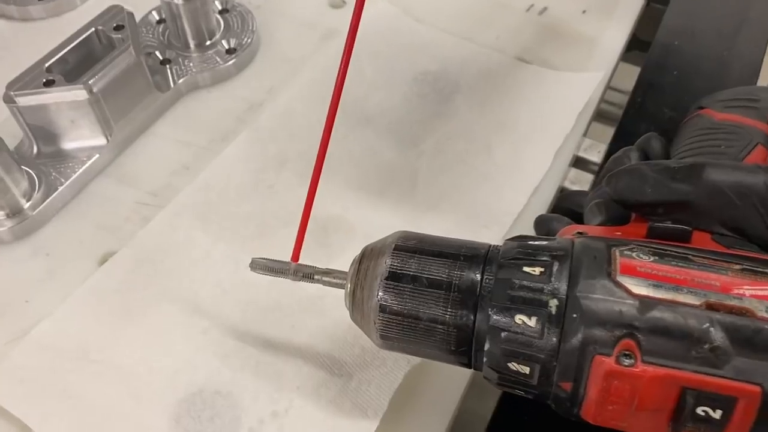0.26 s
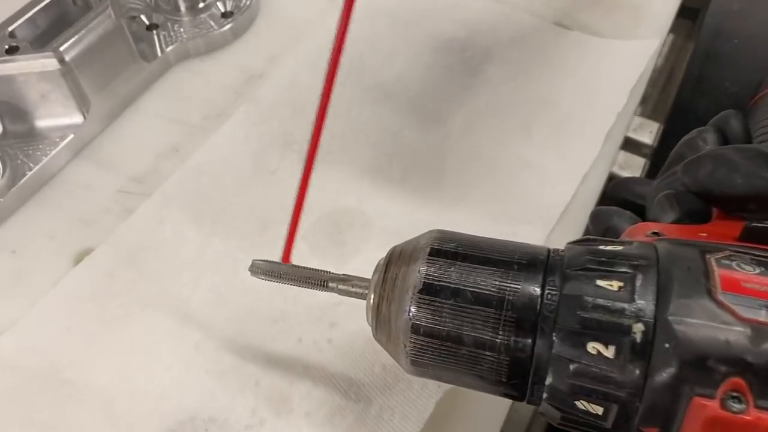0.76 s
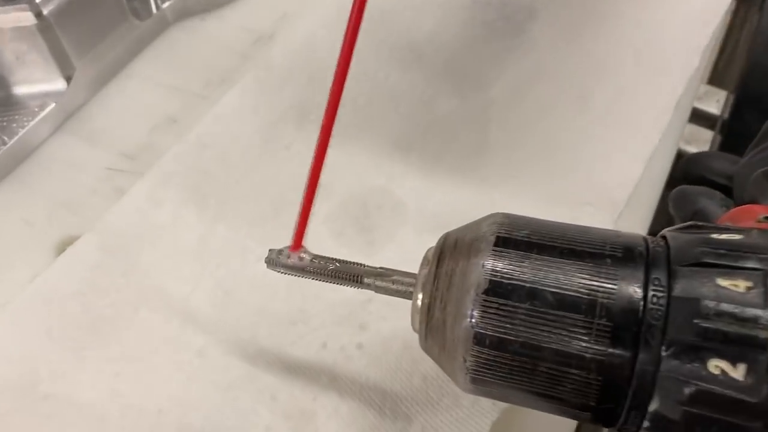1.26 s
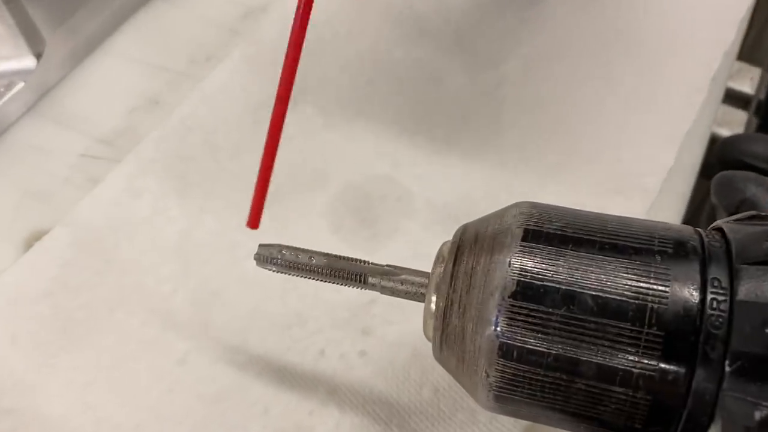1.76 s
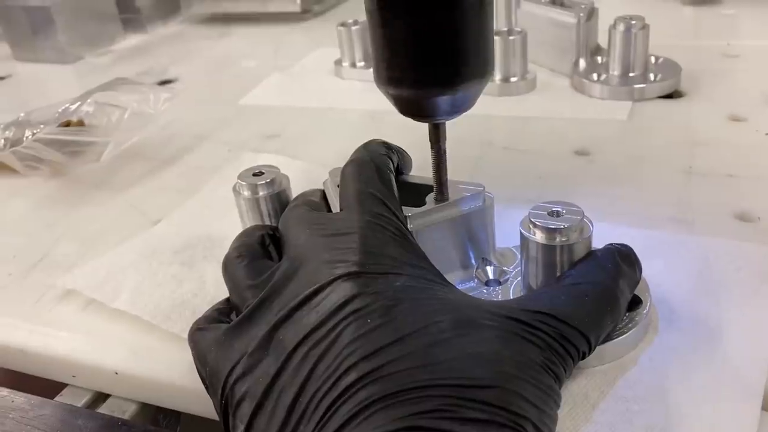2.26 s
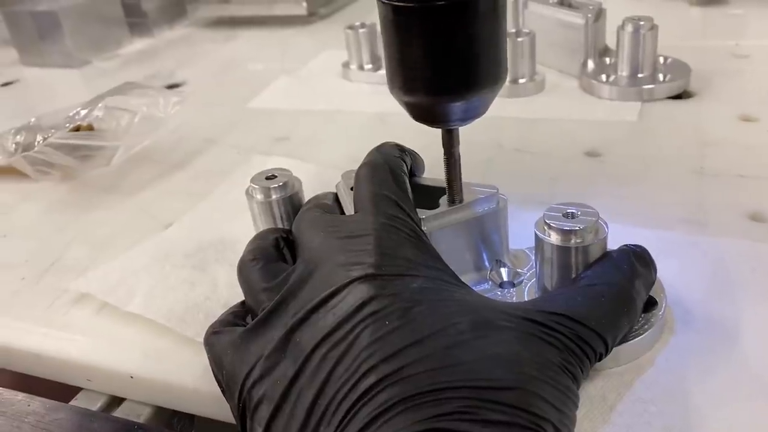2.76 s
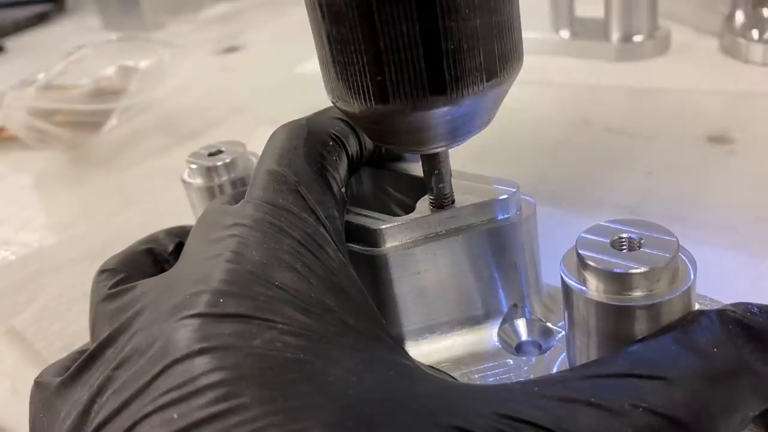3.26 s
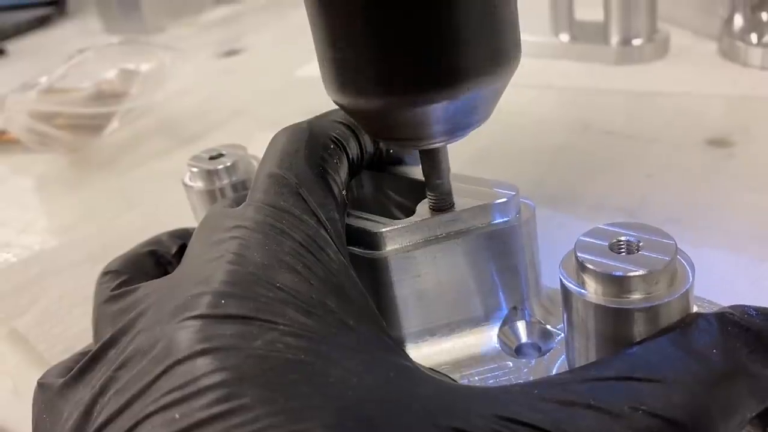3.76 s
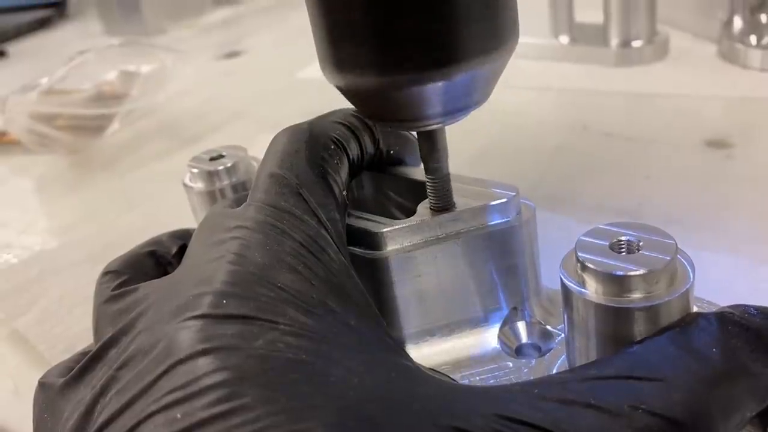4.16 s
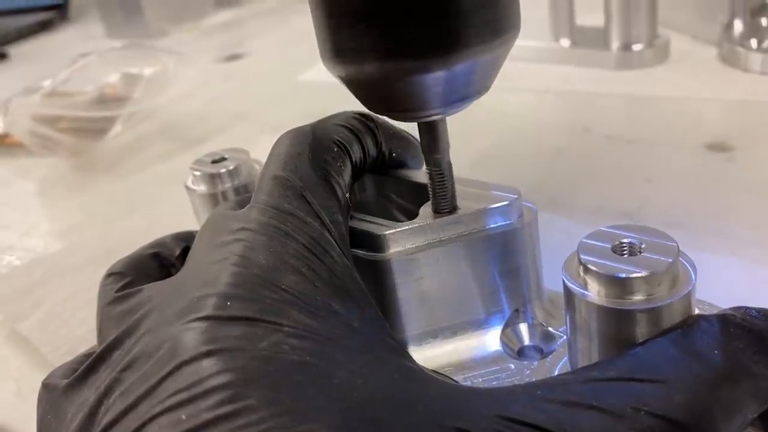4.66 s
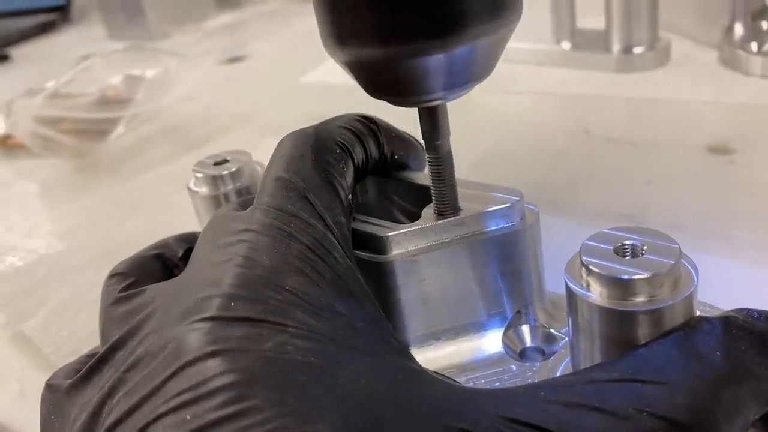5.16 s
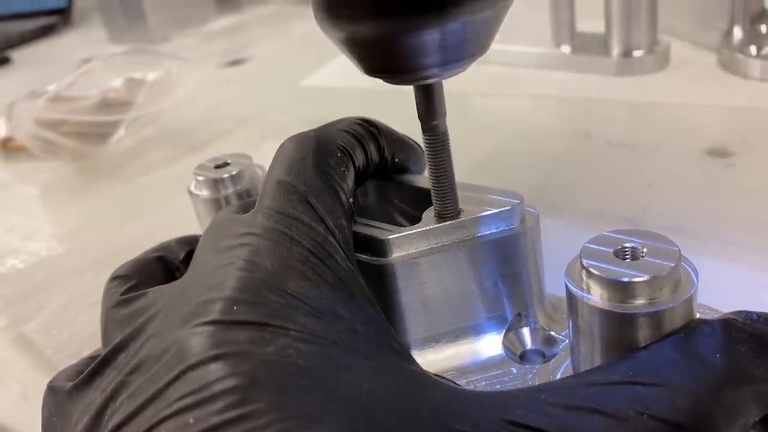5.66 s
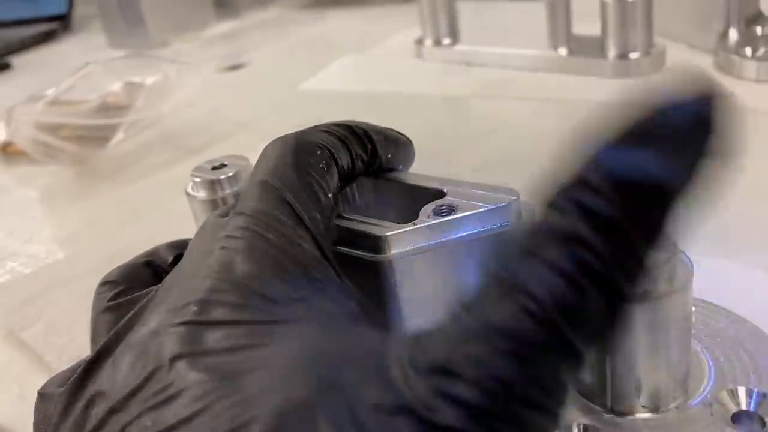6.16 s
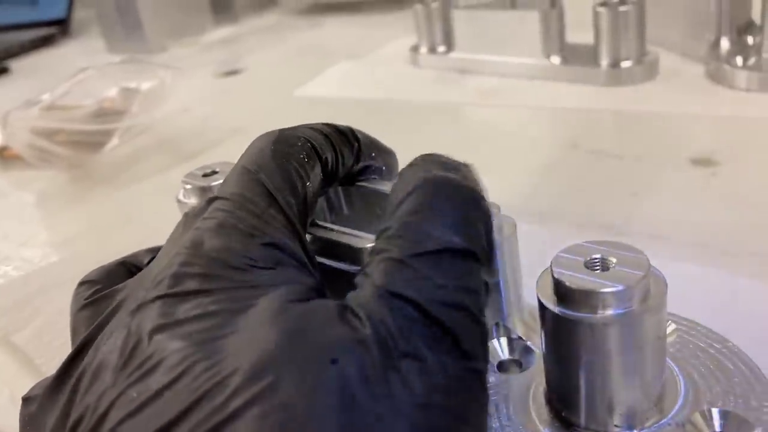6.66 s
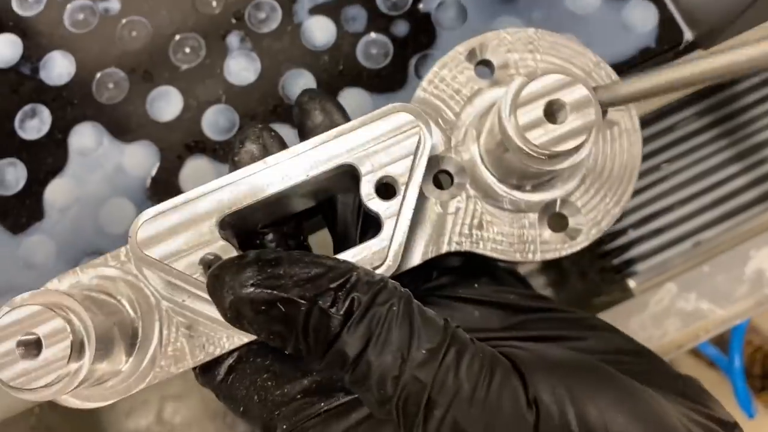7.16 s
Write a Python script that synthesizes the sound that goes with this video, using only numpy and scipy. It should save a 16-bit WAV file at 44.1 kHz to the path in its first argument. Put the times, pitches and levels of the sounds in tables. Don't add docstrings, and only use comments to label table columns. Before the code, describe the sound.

Close stereo pickup at a workshop bench with low ventilation hum. A spray can clicks and hisses briefly, foam fizzes and small parts tick. A cordless drill growls slowly as it taps aluminium, chips scraping, then coasts. Its direction switch snaps and it backs out, whine rising, sagging and climbing again. It brakes with a clack; gloves rustle and squeak, then an air gun hisses.

```python
import sys
import numpy as np
from scipy import signal
from scipy.fft import rfft, irfft, next_fast_len
from scipy.io import wavfile
from scipy.ndimage import map_coordinates

SR = 44100
rng = np.random.default_rng(int(sys.argv[2]) if len(sys.argv) > 2 else 0)


def materialize(psi):
    bounded = np.clip(np.atleast_2d(psi).T, -1, 1)
    quanta = np.round(bounded * 32767).astype(np.int16)
    wavfile.write(sys.argv[1], SR, quanta)


def nominal_scale(level):
    x = np.asarray(level, float) / 20
    return 10 ** x


N = 327663


def at(t0, t1):
    return np.arange(int(t0 * SR), min(int(t1 * SR), N)) / SR


def columns(table):
    s, *cols = np.transpose(table)
    t = at(s[0], s[-1])
    return t, [np.interp(t, s, c) for c in cols]


def on_log(hz, points):
    point_hz, value = np.transpose(points)
    return np.interp(np.log(hz + 1), np.log(point_hz), value)


def walk(n, rate):
    k = int(n * rate / SR) + 2
    return np.interp(np.linspace(0, k - 1, n), np.arange(k), 1.36 * rng.standard_normal(k))


def effort(t, gestures):
    power = 0
    for start, held, db, rise, fall in gestures:
        before = 20 * np.maximum(start - t, 0) / max(rise, .001)
        after = 20 * np.maximum(t - start - held, 0) / max(fall, .001)
        power = power + nominal_scale(2 * (db - before - after))
    return 10 * np.log10(power + 1e-14)


def hiss(n, colour, ref, flicker_db, rate, alike):
    top_hz = 15800
    m = next_fast_len(n)
    hz = np.arange(m // 2 + 1) * SR / m
    left, other = rfft(rng.standard_normal((2, m))) * nominal_scale(on_log(hz, colour)) * (hz > 33) * (hz < top_hz)
    share = np.clip(alike, 0, 1) ** np.clip(hz / 800, 0, 1)
    both = np.array([left, share * left + np.sqrt(1 - share ** 2) * other])
    both /= np.std(irfft(left * (hz > ref[0]) * (hz < ref[1]), m))
    both = both.astype(np.complex64)
    band = np.floor(2 * np.log2(np.clip(hz, 33, top_hz - 1)))
    return sum(irfft(both * (band == b), m)[:, :n] * nominal_scale(flicker_db * walk(n, rate)) for b in np.unique(band))


def flow(t, gestures, colour, flicker_db, rate, alike, grain, extra_db):
    rough = nominal_scale(grain * walk(len(t), 500))
    noise = hiss(len(t), colour, (1500, 6500), flicker_db, rate, alike)
    return nominal_scale(effort(t, gestures) + extra_db) * rough * noise


def tone(hz, wobble, rate=40):
    n = len(hz)
    phase = 2 * np.pi * np.cumsum(hz) / SR + 2 * wobble * walk(n, rate)
    apart = .8 * walk(n, 3)
    return np.sqrt(2) * np.sin([phase, phase + apart]) * nominal_scale(5 * wobble * walk(n, rate))


def notched(x, notches):
    for hz, width_hz in notches:
        x = signal.lfilter(*signal.iirnotch(hz, hz / width_hz, SR), x)
    return x


def bands(t, table):
    out = 0
    for hz, width_hz, gesture in table:
        band = signal.lfilter(*signal.iirpeak(hz, hz / width_hz, SR), rng.standard_normal(len(t)))
        out = out + nominal_scale(effort(t, [gesture])) * band / band.std()
    return np.array([out, out])


# pitch_hz, loss_db
PORT_SHADOW = [(100, 1), (300, 3.5), (1200, 7), (2500, 5), (4500, 8.5), (6500, 2)]


def add(mix, t, x, pan=0.):
    m = next_fast_len(x.shape[1] + 512)
    shade = nominal_scale(-pan * on_log(np.arange(m // 2 + 1) * SR / m, PORT_SHADOW))
    i = int(t * SR)
    x = x[:, :N - i]
    mix[0, i:i + x.shape[1]] += x[0]
    mix[1, i:i + x.shape[1]] += irfft(rfft(x[1], m) * shade, m)[:x.shape[1]]


def clicks(mix, table, thud_hz, crack_db, tail_db, body=()):
    t = at(0, .12)
    for s, db, thud_db, hz, t60, pan_db in table:
        fall = np.exp(-np.log(1000) * t / max(t60, .003)) * np.minimum(t / 0.00026, 1)
        noise = rng.standard_normal((3, len(t)))
        ring = signal.lfilter(*signal.iirpeak(hz, 2.5, SR), noise[0])
        hit = (ring / ring.std() + nominal_scale(crack_db) * np.diff(noise[1], prepend=0)) * fall
        hit *= 1 + 2 * np.exp(-((t - .0006) / .0002) ** 2)
        hit = signal.lfilter(*signal.butter(2, hz / 4, "high", fs=SR), hit)
        if body:
            modes = 0
            for k, (f, width_hz, d) in enumerate(body):
                modes = modes + (-1) ** k * nominal_scale(d) * np.sin(2 * np.pi * f * t) * np.exp(-np.pi * width_hz * t)
            strike = (t == 0) + 0.12 * noise[0] * np.exp(-t / 0.0012)
            hit = signal.fftconvolve(strike, modes)[:len(t)] * np.sqrt(fall)
        thud = signal.lfilter(*signal.iirpeak(thud_hz, 2.5, SR), noise[2])
        hit = hit / abs(hit).max() + nominal_scale(thud_db - 4.5) * thud / thud.std() * np.sqrt(fall)
        tail = nominal_scale(tail_db) * rng.standard_normal((2, len(t))) * np.exp(-t / 0.0061)
        add(mix, s, nominal_scale(db) * (hit * nominal_scale(np.array([[pan_db], [-pan_db]]) / 2) + tail))


# start_s, level_db
SHOP_LEVEL = [(0, -55.5), (2.03, -53), (2.3, -55), (3.3, -56), (4.2, -73), (5.2, -57), (5.9, -57.5),
              (6.15, -66), (6.96, -64.5), (6.98, -74), (7.43, -81)]
# pitch_hz, level_db (per Hz)
SHOP_COLOUR = [(25, -4), (40, -15.5), (57, -2.5), (100, -7.5), (170, -15), (300, -25), (600, -34.5),
               (1500, -44.5), (3000, -51), (6500, -61), (8000, -52), (9300, -57), (13500, -66),
               (15500, -62)]
# start_s, held_s, level_db, rise_s, fall_s
COMPRESSOR = [(0.156, 0.277, -50, 0.27, 0.14), (0.62, 0.843, -49, 0.18, 0.18)]
# pitch_hz, level_db
LAMP = [(7900, -86), (14790, -79)]


def shop(mix):
    t, (db,) = columns(SHOP_LEVEL)
    drone = nominal_scale(effort(t, COMPRESSOR)) * tone(57 + 0 * t, 0.071, 5.3)[0]
    air = nominal_scale(db) * hiss(len(t), SHOP_COLOUR, (30, 70), 0.64, 3.3, 0.3)
    whistle = sum(nominal_scale(d) * tone(f + 0 * t, 0.39, 330) for f, d in LAMP)
    add(mix, 0, drone + air + whistle, .4)


# start_s, held_s, level_db, rise_s, fall_s
SPRAY = [
    (.217, 0.0087, -65, -0.05, -0.2),
    (0.232, 0.022, -43, .002, 0.06),
    (.264, .157, -42, .008, .009),
    (.275, 0, -44, 0.04, 0.04),
    (.43, 0.03, -66, .001, .09),
]
# pitch_hz, level_db (per Hz)
SPRAY_COLOUR = [(300, -12), (800, -5), (1600, -5), (2200, -10.5), (3000, 3), (3570, -5), (4250, 5),
                (4800, -5), (5300, 3.5), (6300, -4.5), (7300, 4), (10000, -2), (13000, 1), (15500, -1)]
# pitch_hz, width_hz
STRAW_NOTCHES = [(2300, 200), (3570, 190), (4800, 210)]
# start_s, peak_db, thud_db, pitch_hz, left_minus_right_db
VALVE = [
    (0.218, -28, -21, 9000, -1),
    (0.2375, -16, -7, 8350, 5.5),
    (0.241, -17, -9.5, 7850, -1),
    (0.263, -14.5, -25, 7400, 0),
    (0.273, -6.5, -18.5, 12500, 10.5),
    (0.4522, -39.5, -9, 2970, 4),
]


def spray_can(mix):
    t = at(.19, .62)
    spray = flow(t, SPRAY, SPRAY_COLOUR, 0.92, 40, 0.37, 1.9, 1.0)
    add(mix, t[0], notched(spray, STRAW_NOTCHES), .5)
    t60_s = 0.0051
    clicks(mix, [(s, db, thud, hz, t60_s, pan) for s, db, thud, hz, pan in VALVE], 650, 0, -25.0)


# start_s, peak_db, thud_db
TICKS = [(0.8753, -65, 13.5), (1.191, -43.5, -23), (1.208, -49, -18), (1.2165, -54, -19), (1.238, -53, -15),
         (1.2435, -48.5, -13), (1.261, -54, 3), (1.3192, -58, 8), (1.3315, -51.5, 4), (1.3468, -50.5, -2),
         (1.748, -47, 1), (1.9315, -53, 8.5), (1.997, -46, -12), (2.08, -41, -2)]
# pitch_hz, width_hz, level_db
TICK_BODY = [(1100, 280, -6), (1970, 160, 0.5), (3570, 300, -5.5), (4850, 400, -14), (7300, 520, -0.5)]


def ticks(mix):
    hz, t60_s, pan_db = 1960, 0.024, 7
    clicks(mix, [(*row, hz, t60_s, pan_db) for row in TICKS], 300, -10.5, -27.5, TICK_BODY)


# start_s, held_s, level_db, rise_s, fall_s
FOAM = [
    (1.06, 0.083, -61.5, .014, .1),
    (1.17, 0.084, -69, .01, .03),
]
# pitch_hz, width_hz, level_db
STRAW = [(1740, 105, 2), (2800, 200, -0.5), (3770, 170, -4.5), (5640, 200, -19)]


def foam(mix):
    t = at(1.03, 1.32)
    noise = rng.standard_normal((2, len(t)))
    fizz = nominal_scale(-21) * noise
    for f, width_hz, d in STRAW:
        fizz = fizz + nominal_scale(d) * signal.lfilter(*signal.iirpeak(f, f / width_hz, SR), noise)
    add(mix, t[0], nominal_scale(effort(t, FOAM)) * fizz / fizz.std(), .4)


def shelf(x, hz, db):
    high = signal.sosfilt(signal.butter(2, hz, "high", fs=SR, output="sos"), x)
    return x + (nominal_scale(db - db.mean()) - 1) * high


def rattle(t, tooth_hz, depth):
    turns = np.cumsum(tooth_hz) / SR
    size = nominal_scale(2.8 * rng.standard_normal(int(turns[-1]) + 1))[turns.astype(int)]
    gate = 1 - depth + depth * size * 2 * np.exp(-(turns % 1) / 0.73)
    return gate / np.sqrt(np.mean(gate ** 2))


# pitch_hz, width_hz, level_db
HOUSING = [(890, 86, -11.5), (1876, 88, -2.5), (2032, 38, -4.5), (2675, 110, -13), (3210, 100, -5.5),
           (4060, 65, -6), (4196, 180, -7.5), (4400, 65, -21)]


def rings(n, beads_db, rate):
    noise = rng.standard_normal((2, n))
    noise[1] = 0.6 * noise[0] + 0.45 * noise[1]
    out = 0
    for f, width_hz, d in HOUSING:
        ring = signal.lfilter(*signal.iirpeak(f, f / width_hz, SR), noise)
        out = out + ring * nominal_scale(d + beads_db * walk(n, rate))
    return nominal_scale(21.5) * out


# start_s, gear_noise_db, bench_shake_db
TAP_IN = [(2.074, -81, -59), (2.079, -44.5, -53), (2.137, -44, -48.5), (2.449, -42.5, -43.5),
          (2.579, -43, -35), (2.941, -37.5, -33), (3.005, -38.5, -53), (3.085, -40.5, -45),
          (3.345, -40, -43.5)]
# pitch_hz, level_db (per Hz)
IN_COLOUR = [(120, -19), (300, -4), (500, 0.5), (800, 3.5), (1100, -4), (1500, -13.5), (2050, -7.5),
             (2700, -12), (3300, -12.5), (4200, -12.5), (5400, -18), (6800, -12.5), (10000, -15),
             (15000, -20)]
# start_s, pitch_hz
MESH = [(2.075, 272), (2.38, 297), (2.5, 275), (2.6, 289), (2.65, 215), (2.78, 231), (2.92, 246),
        (3.12, 230), (3.21, 215), (3.265, 176), (3.345, 178)]
# start_s, held_s, level_db, rise_s, fall_s
PLANET = [
    (2.25, 0.33, -48, 0.59, 0.16),
]
# pitch_hz, level_db
PART_RING = [(2003, -57), (2105, -60)]
# start_s, held_s, level_db, rise_s, fall_s
GROAN = [(3.225, 0.034, -47, .04, .04), (3.3, .03, -43.5, 0.021, 0.014)]
GROAN_UPPER = [(3.25, 0.029, -48, 0.034, 0.028)]
# pitch_hz, level_db
IN_SWITCHING = [(1865, -56.5), (3731, -53.5), (5597, -63), (7461, -46), (14925, -82)]


def tap_in(mix):
    t, (db, shake_db) = columns(TAP_IN)
    pressed_db = shake_db + 44
    shake_hz = 78.3 + (83.45 - 78.3) * np.clip(pressed_db / 9.5, 0, 1)
    octave_db = -61.5 + 1.96 * pressed_db
    mesh_hz = np.interp(t, *np.transpose(MESH))
    planet_db = effort(t, PLANET)
    growl = hiss(len(t), IN_COLOUR, (300, 1300), 1.4, 11, 0.55) + nominal_scale(-12.0) * rings(len(t), 3.5, 25)
    growl = growl * rattle(t, shake_hz, 0.2)
    out = nominal_scale(db) * shelf(growl, 2300, -0.95 * np.maximum(db, -46))
    for k, level_db in ((1, shake_db), (2, octave_db), (3, octave_db - 15.0), (4, octave_db - 12.0)):
        out += nominal_scale(level_db) * tone(k * shake_hz, 0.05)[0]
    out += nominal_scale(planet_db - 4) * tone(mesh_hz, 0.67, 23)
    out += nominal_scale(-50.5) * tone(2 * mesh_hz, 0.46, 28)
    out += nominal_scale(-64) * tone(3 * mesh_hz, .35, 30)
    out += sum(nominal_scale(d + db + 43.5) * tone(f + 0 * t, 0.74, 25) for f, d in PART_RING)
    out += nominal_scale(effort(t, GROAN)) * tone(2 * mesh_hz, .15, 30)
    out += sum(nominal_scale(effort(t, GROAN_UPPER)) * tone(2 * k * mesh_hz, .2, 30) for k in range(2, 7))
    out += nominal_scale(planet_db) * tone(195.6 + 0 * t, 0.081, 10)
    out += sum(nominal_scale(d) * tone(f + 0 * t, 0.14, 24) for f, d in IN_SWITCHING)
    started = np.clip((t - 2.076) * 500, 0, 1)
    add(mix, TAP_IN[0][0], out * started, .3)


# start_s, held_s, level_db, rise_s, fall_s
CHIPS = [
    (2.62, 0, -43, 0.033, 0.17),
    (3.33, 0.0089, -47, 0.91, .002),
    (2.761, 0, -47, .004, .03),
    (2.965, 0.0052, -43.5, .006, 0.052),
    (3.049, 0.037, -51, .005, .04),
    (3.17, 0.019, -49, .004, .03),
    (3.252, 0.00053, -49, .004, .03),
    (3.307, 0.022, -69, .004, .03),
]
# pitch_hz, level_db (per Hz)
CHIP_COLOUR = [(900, -2.5), (1400, -0.5), (2700, -2.5), (4000, -28)]


def chips(mix):
    t = at(2.55, 3.35)
    add(mix, t[0], flow(t, CHIPS, CHIP_COLOUR, 4.4, 12, 0.32, 0.86, 0), .3)


# start_s, held_s, level_db, rise_s, fall_s
COAST = [
    (3.347, 0.055, -50.5, .002, 0.16),
]
# pitch_hz, level_db (per Hz)
COAST_COLOUR = [(200, -1), (500, -5), (1000, 0), (2000, -3.5), (4500, -7), (7000, -19), (10000, -15),
                (15500, -28)]


def coasting(mix):
    t = at(3.34, 3.49)
    add(mix, t[0], flow(t, COAST, COAST_COLOUR, 1.5, 15, 0.15, 1.2, 0), .7)


# start_s, peak_db, thud_db, t60_s, left_minus_right_db
SWITCH = [
    (3.3994, -41, -20, 0.0092, 2.5),
    (3.4876, -13, -34, 0.025, 7.5),
    (3.489, -18, -32, 0.017, 12),
    (3.495, -36, -14.5, 0.012, 4),
    (3.502, -34.5, -9, 0.0066, 2),
    (3.5132, -31, -11, 0.0091, 9.5),
    (3.5988, -28.5, -24, 0.0056, 6),
    (3.6052, -29, -6, 0.0073, 1),
    (3.6241, -21.5, -11, 0.02, 10),
    (3.6302, -21.5, -5, 0.013, 7),
]
# pitch_hz, width_hz, level_db
SWITCH_BODY = [(680, 190, -15.5), (1250, 120, -20), (2070, 85, -17), (3510, 280, -2.5), (4150, 320, -4.5),
               (4750, 140, -13), (6000, 330, 0), (6790, 400, 1.5), (7380, 260, -5.5), (8150, 280, -3),
               (10060, 500, -2), (12460, 360, -2.5)]
# start_s, held_s, level_db, rise_s, fall_s
SLIDE = [
    (3.485, 0.021, -54, .012, 0.025),
    (3.525, 0.045, -65, .02, 0.054),
]
# pitch_hz, level_db (per Hz)
GLOVE_COLOUR = [(300, -0.5), (700, -2.5), (1300, -5.5), (2500, -10.5), (4500, -7.5), (7000, -10.5),
                (10000, -9.5), (15500, -12)]


def direction_switch(mix):
    t = at(3.46, 3.6)
    add(mix, t[0], flow(t, SLIDE, GLOVE_COLOUR, 3.7, 30, 0.47, 1.7, 0), .7)
    rows = [(s, db, thud, 2000, t60, pan) for s, db, thud, t60, pan in SWITCH]
    clicks(mix, rows, 610, -33.5, -24.0, SWITCH_BODY)


def glide(t, points):
    s, v = np.transpose(points)
    slope = np.gradient(v, s)
    k = np.clip(np.searchsorted(s, t) - 1, 0, len(s) - 2)
    h = s[k + 1] - s[k]
    u = np.clip((t - s[k]) / h, 0, 1)
    step = (v[k + 1] - v[k]) * u * u * (3 - 2 * u)
    return v[k] + step + h * u * (1 - u) * ((1 - u) * slope[k] - u * slope[k + 1])


def boom(hz, centre_hz, width_hz, db):
    return db / (1 + (2 * (hz - centre_hz) / width_hz) ** 2)


# start_s, rotor_hz
ROTOR = [(3.64, 235), (3.7, 393), (3.78, 530), (3.89, 584), (3.98, 545), (4.18, 400), (4.3, 349),
         (4.48, 259), (4.66, 221), (4.75, 229), (4.9, 330), (5.06, 414), (5.3, 508), (5.5, 547),
         (5.72, 585), (5.8, 576), (6.0, 561), (6.05, 545)]
# start_s, gear_noise_db, mesh_whine_db
TAP_OUT = [(3.586, -66, -41), (3.6, -46, -40), (3.79, -40.5, -62), (3.95, -41, -43), (4.2, -42, -39),
           (4.45, -43.5, -39), (4.7, -43, -49.5), (4.83, -42, -36.5), (5.05, -41, -35.5), (5.4, -42.5, -42),
           (5.65, -44, -45.5), (6.05, -47.5, -60), (6.085, -48, -65)]
# pitch_hz, level_db (per Hz)
OUT_COLOUR = [(120, -26), (300, -8.5), (500, -1.5), (800, 2.5), (1100, -4.5), (1500, -11), (2050, -4),
              (2700, -8.5), (3300, -3.5), (4200, -6), (5400, -9), (6800, -11), (10000, -16.5), (15000, -14)]
ORDERS_LOW = [.17, 1 / 3, .5, 1, 4 / 3, 2, 3, 7, 7.3, 8, 9, 10]
ORDERS_HIGH = [11.35, 11.67, 16, 17, 18, 18.67, 19.67, 20, 20.67, 21, 12]
# level_db, slope_db (per octave of speed), wobble (0-1)
WHINE = [(1.5, 12, 0.33), (-10, -10, 0.43), (-17, 31, 0.5), (2.5, 3.5, 0.17), (-9.5, 29, 0.37),
         (-5, 6, 0.34), (-7.5, 3.5, 0.1), (-10, 28, 0.12), (-33, 29, 0.2), (-9, 3, 0.3), (-4, 33, 0.05),
         (-14, 40, 0.3), (-6.5, 21, 0), (-5.5, 11, 0.3), (-5, 38.5, 0), (-1.5, 39, 0.2), (-7.5, 9, 0.38),
         (-11, 47, 0.02), (-5, 38, 0.2), (-7, 36, 0.4), (-5, 40, 0.2), (-4, 42, 0), (-9.5, 14, 0.3)]
# rotor_multiple, level_db, slope_db (per octave), wobble (0-1), shivers_per_s
MESH_TONES = [(3.43, -2, 0, .38, 16), (3.3, -11, -4, .5, 40), (4.5, -17, -4, .3, 30),
              (5.5, -16, -4, .3, 30), (6.5, -5, 3, .4, 20), (6.92, -4, 3, .4, 20),
              (10.05, -17, -10, .4, 20), (13.56, -30, -27, .3, 25)]
# start_s, held_s, level_db (10 dB = 3 dB deep), rise_s, fall_s
LOOSE = [
    (5.4, 0.35, 9.3, 0.4, 0.22),
]
# start_s, held_s, level_db, rise_s, fall_s
CHOP = [
    (3.585, .165, 6, .01, .5),
    (4.4, .75, 9, 0.065, .4),
    (6.05, .05, -3, 0.68, .1),
]
# pitch_hz, level_db
OUT_SWITCHING = [(1863, -53.5), (3727, -64.5), (5589, -73), (14925, -85)]
# pitch_hz, width_hz
DEAD_SPOTS = [(2280, 160), (2870, 160), (5400, 330)]
# (start_s, held_s, level_db, rise_s, fall_s)
THUMPS = [(316, 57, (5.76, 0, -47.5, 0.1, 0.3)), (480, 60, (5, -1, -47.5, 1.3, -0.7)),
          (335, 50, (6, .02, -52, -0.5, .3)), (150, 35, (5.5, -0.4, -54, 0.8, 0)),
          (94, 30, (4.5, -1.5, -54.5, 2.2, -1)), (151, 88, (3.5, 0.9, -56, 4, 0.3)),
          (734, 180, (3.635, -0.04, -38.5, 0.4, -0.65))]


def tap_out(mix):
    t, (db, mesh_db) = columns(TAP_OUT)
    braking_hz = 6000 * np.maximum(t - 6.048, 0)
    rotor = glide(t, ROTOR) - braking_hz
    octaves = np.log2(rotor / 570)
    strain_db = 6.5 * np.exp(-np.maximum(t - 3.68, 0) / 0.058)
    whine_db = -38 + 2.5 * octaves + 0.31 * (db + 42.5) + strain_db
    gear_ratio, knock_s = 43.15, 5
    turns = np.cumsum(rotor / gear_ratio) / SR
    throb = nominal_scale(nominal_scale(effort(t, LOOSE)) * np.cos(2 * np.pi * (turns - np.interp(knock_s, t, turns))))
    ring_db = -1.0 - 3.5 * np.clip((t - 5.68) / 0.27, 0, 1)
    gears = hiss(len(t), OUT_COLOUR, (1400, 3000), 1.37, 15, 0.22) + nominal_scale(ring_db) * rings(len(t), 4.1, 25)
    gears = gears * rattle(t, rotor / 3, 0.19)
    out = nominal_scale(db) * throb * shelf(gears, 1630, 5.5 * octaves)
    spun_up = np.clip((t - 3.64) / 0.0055, 0, 1) * np.clip((6.066 - t) / 0.0081, 0, 1)
    cowl = (4150, 500, 10)  # Hz, width Hz, dB
    shell = (1910, 250, 8.5)
    for k, (d, slope, wobble) in zip(ORDERS_LOW + ORDERS_HIGH, WHINE):
        hz = k * rotor
        level_db = whine_db + d + boom(hz, *cowl) + slope * octaves + 0.76 * on_log(hz, OUT_COLOUR)
        out += spun_up * nominal_scale(level_db) * tone(hz, wobble)
    for k, d, slope, wobble, rate in MESH_TONES:
        hz = k * rotor
        level_db = mesh_db + d + boom(hz, *shell) + boom(hz, *cowl) + slope * octaves
        level_db = level_db + .9 * on_log(hz, OUT_COLOUR)
        out += spun_up * throb * nominal_scale(level_db) * tone(hz, max(wobble, .25), rate)
    out = .62 * notched(out, DEAD_SPOTS) + .38 * out + bands(t, THUMPS)
    chop_db = effort(t, CHOP)
    for f, d in OUT_SWITCHING:
        out = out + nominal_scale(d + chop_db) * nominal_scale(4 * walk(len(t), 22)) * tone(f + 0 * t, .25, 30)
    add(mix, TAP_OUT[0][0], out, 1.05)


# start_s, peak_db, thud_db, t60_s, left_minus_right_db
BRAKE = [
    (3.6272, -19.5, -18, 0.012, 7.3),
    (6.0537, -34, -19, 0.023, 4.4),
    (6.065, -15, -20.5, 0.029, 15),
    (6.0734, -21.5, -11, 0.046, 6.1),
]
# pitch_hz, width_hz, level_db
BRAKE_BODY = [(845, 310, -14), (2100, 220, -19), (3600, 450, 3.5), (4900, 260, -1), (6440, 770, -1),
              (9300, 820, 1), (11950, 830, -5)]


def brake(mix):
    rows = [(s, db, thud, 4460, t60, pan) for s, db, thud, t60, pan in BRAKE]
    clicks(mix, rows, 710, -8, -45.0, BRAKE_BODY)


# start_s, peak_db, left_minus_right_db
CLUNKS = [
    (3.6285, -20, 6),
    (6.0535, -24, 6.5),
    (6.0755, -29, -2),
]
# pitch_hz, width_hz, level_db
CLUNK_BODY = [(600, 40, -5), (900, 60, -3), (1300, 170, -11)]


def clunks(mix):
    clicks(mix, [(s, db, -30, 2000, .05, pan) for s, db, pan in CLUNKS], 530, -30, -40.5, CLUNK_BODY)


# start_s, held_s, level_db, rise_s, fall_s
GLOVES = [(6.102, 0, -55.5, 0.0071, 0.1), (6.17, 0.03, -62, .05, 0.15), (6.27, 0.0049, -65.5, 0.068, 0.025),
          (6.409, 0.016, -65.5, 0.21, 0.051), (6.575, 0.0031, -67.5, 0.029, 0.14),
          (6.74, 0.12, -71.5, 0.065, 0.22), (6.92, 0.01, -66, 0.36, 0.079), (6.2, .35, -79, .1, 0.086)]
# start_s, peak_db, thud_db, pitch_hz
SNAPS = [(6.1642, -46, -20, 4480), (6.2592, -42.5, -23, 1440), (6.2665, -47, -22, 5000),
         (6.2884, -48, -15, 1450), (6.392, -44.5, -22, 3310), (6.42, -58, 5, 900), (6.564, -65, -8, 1290),
         (6.5705, -66, -16, 4200), (6.8132, -55, -15, 1300), (6.8557, -50, -17, 3020),
         (6.8771, -59, -15, 1320), (6.897, -55, 2, 800)]


def gloves(mix):
    t = at(6.07, 6.976)
    add(mix, t[0], flow(t, GLOVES, GLOVE_COLOUR, 2.1, 15, 0.16, 2.7, 0.78), .7)
    clicks(mix, [(*row, 0.012, 3) for row in SNAPS], 280, -18.5, -31)


# start_s, end_s, pitch_hz, level_db
FAR = [
    (6.56, 6.75, 4600, -83),
    (6.723, 7.1, 3350, -76),
]


def far_machines(mix):
    for t0, t1, hz, db in FAR:
        t = at(t0, t1)
        add(mix, t0, nominal_scale(db) * np.hanning(len(t)) ** 0.26 * tone(hz + 0 * t, 0.4, 60))


# start_s, held_s, level_db, rise_s, fall_s
SQUEAK = [
    (6.81, 0.022, -63, 0.044, 0.12),
    (6.856, 0.003, -51.5, .004, 0.015),
]


def squeak(mix):
    t = at(6.72, 6.92)
    add(mix, t[0], nominal_scale(effort(t, SQUEAK)) * tone(1270 + 0 * t, 0.84, 220), .7)


# start_s, held_s, level_db, rise_s, fall_s
JET = [
    (6.979, .5, -46, 0.0018, .01),
    (7.32, 0.018, -49.5, 0.075, .12),
]
# pitch_hz, level_db (per Hz)
JET_COLOUR = [(200, -26.5), (600, -16.5), (1000, -12.5), (1600, -9.5), (3000, -4.5), (6400, -4), (7300, 1),
              (8200, 4), (10000, 2), (13000, 2), (15500, 3.5)]
# start_s, delay_ms
JET_ECHO = [
    (6.978, 0.325),
    (7.25, 0.278),
    (7.43, 0.193),
]
# start_s, held_s, level_db, rise_s, fall_s
HOLE = [
    (7.02, 0.1, -51, 0.09, 0.15),
    (7.32, 0, -45.5, 0.022, 0.045),
    (7.4, .05, -61, .05, .05),
]
# pitch_hz, level_db (per Hz)
HOLE_COLOUR = [(900, -17.5), (1400, 2), (2600, -4.5), (3600, -15)]
# (start_s, held_s, level_db, rise_s, fall_s)
EDGES = [(7250, 450, (7.11, .16, -48, .15, .12)), (2700, 350, (7.06, .07, -53, .1, .12)),
         (1650, 300, (7.31, .02, -50, .03, .03)), (2400, 450, (7.315, .015, -52, .03, .03)),
         (6050, 400, (7.39, .04, -50, .06, .05)), (4000, 250, (7.015, .01, -54, .03, .03))]
# pitch_hz, width_hz
PART_NOTCHES = [(3480, 220), (4200, 180), (5650, 110)]


def air_gun(mix):
    t = at(6.976, 7.43)
    air = flow(t, JET, JET_COLOUR, 1, 30, .5, 1, 1)
    echo_ms = np.interp(t, *np.transpose(JET_ECHO))
    late = np.arange(len(t)) - echo_ms * SR / 1000
    treble = signal.sosfiltfilt(signal.butter(2, 7000, "high", fs=SR, output="sos"), air)
    echo = np.array([map_coordinates(port, [late], order=3) for port in treble])
    holes = flow(t, HOLE, HOLE_COLOUR, 2.2, 30, 0.23, 1, 1)
    add(mix, t[0], notched(air + .65 * echo + holes, PART_NOTCHES) + bands(t, EDGES), .6)


def scene():
    mix = np.zeros((2, N))
    shop(mix)
    spray_can(mix)
    ticks(mix)
    foam(mix)
    tap_in(mix)
    chips(mix)
    coasting(mix)
    direction_switch(mix)
    tap_out(mix)
    brake(mix)
    clunks(mix)
    gloves(mix)
    far_machines(mix)
    squeak(mix)
    air_gun(mix)
    return mix


def low_pass(x):
    return signal.sosfilt(signal.butter(12, 16980, fs=SR, output="sos"), x)


def record(dry):
    shared_hz, turn_hz = 6750, 4370
    m = next_fast_len(N)
    hz = np.arange(m // 2 + 1) * SR / m
    left, right = rfft(dry, m)
    shared = np.clip((hz - shared_hz) / 800 + 1, 0, 1)
    lead = 2 * np.pi * np.maximum(hz - shared_hz, 0) / turn_hz
    right = np.sqrt(1 - shared ** 2) * right + shared * left * np.exp(1j * lead)
    heard = irfft(np.array([left, right]), m)[:, :N]
    return low_pass(heard)


dry = scene()
out = record(dry)
materialize(out)
```